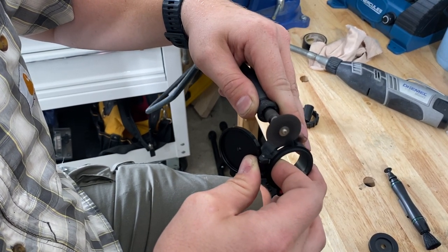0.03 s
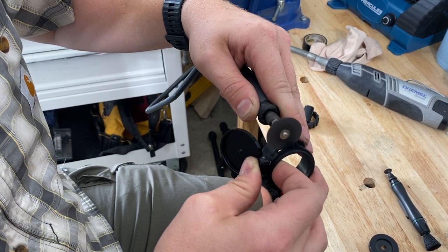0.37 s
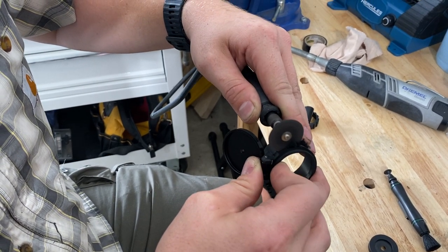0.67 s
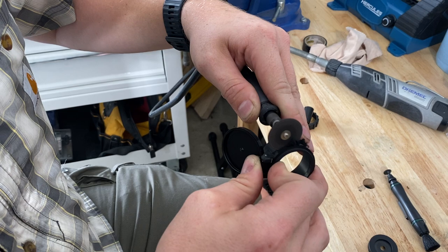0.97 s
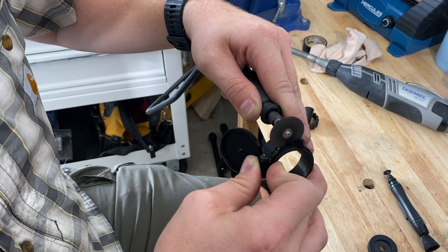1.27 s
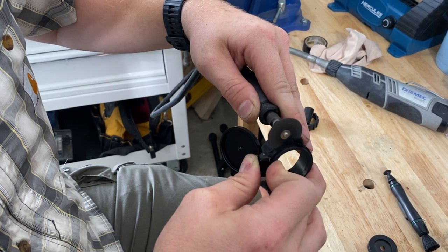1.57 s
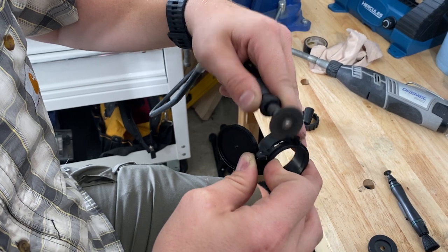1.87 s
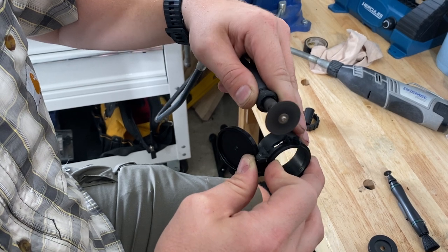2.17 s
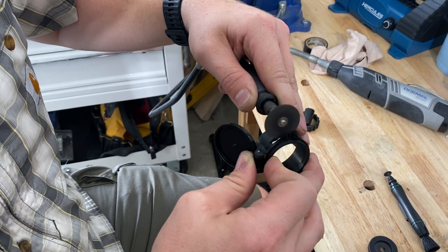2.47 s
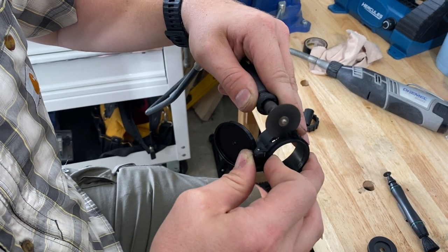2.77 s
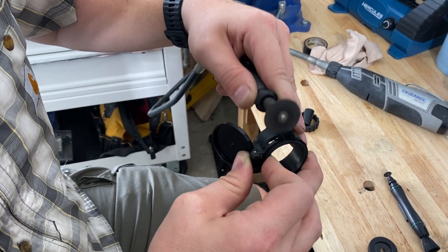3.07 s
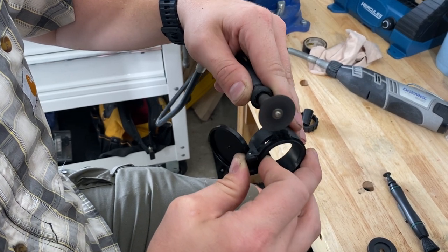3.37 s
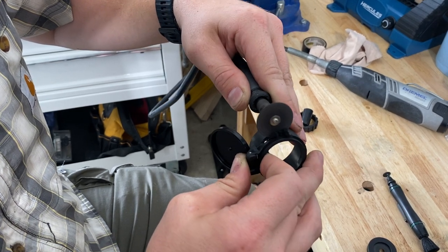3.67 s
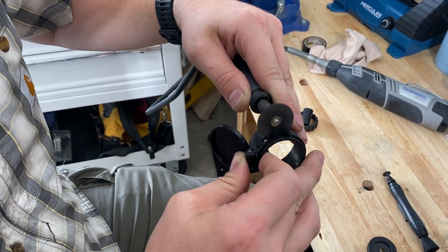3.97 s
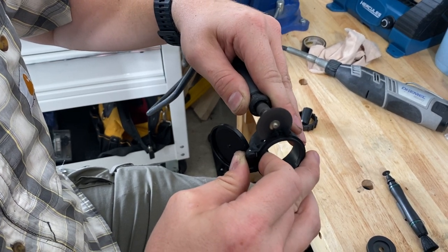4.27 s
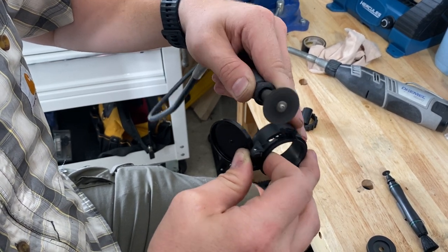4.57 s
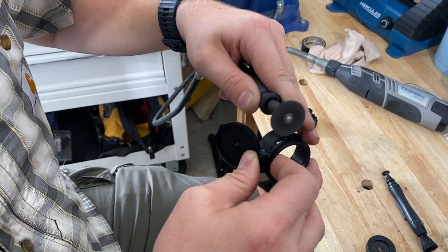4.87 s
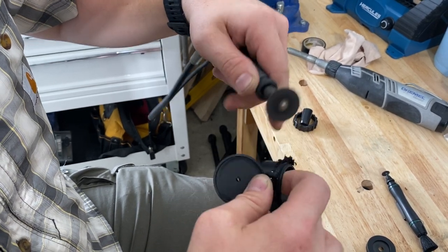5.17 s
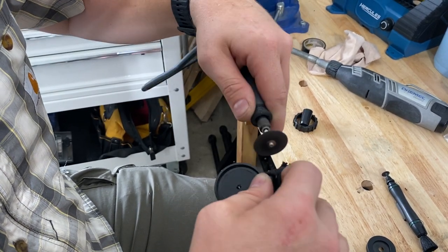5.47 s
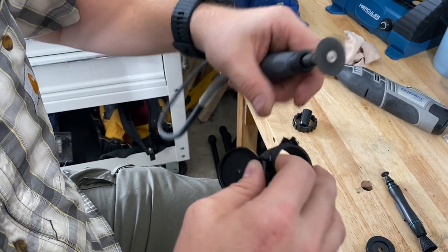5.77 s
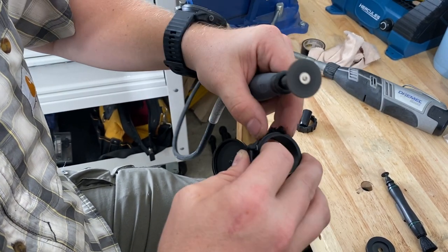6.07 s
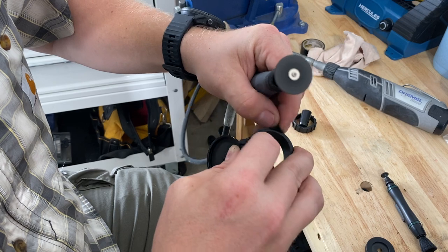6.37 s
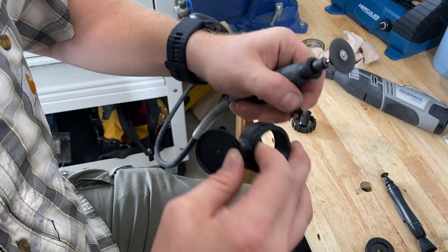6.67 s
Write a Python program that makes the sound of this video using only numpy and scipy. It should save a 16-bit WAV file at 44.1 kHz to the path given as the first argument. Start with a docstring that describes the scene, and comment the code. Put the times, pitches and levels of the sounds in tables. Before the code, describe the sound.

A handheld rotary tool is already cutting hollow plastic at the start, close to the microphone, with a chattering, gritty rasp and a high squeal over the motor's laboured whine. At about 1.9 seconds the wheel lifts and the pitch climbs. A second, rougher cut runs from 2.3 to 3.1 seconds, dragging the pitch down before it recovers again. The third cut, from 3.7 to 4.5 seconds, slows the motor once more and squeals most sharply just after 4 seconds. The motor then speeds back up. From 5 seconds the tool runs free with a stronger, steady hum, its flexible shaft whirring and buzzing in its sleeve, with short rattles near 5.8 and 6.7 seconds. It is still running at the end, just before 7 seconds. The workshop sounds fairly dry, with a faint low rumble and electrical hum underneath.

```python
"""A workbench, a phone's microphone close to a flexible-shaft rotary tool on a hollow plastic part.
The first of three cuts is under way: the slightly crooked wheel strikes the plastic once a turn and
grinds through it. Each cut drags the speed down, and the motor recovers whenever the wheel lifts.
At 5 s the tool is lifted away: the bent shaft whips, then runs free, humming and buzzing in its sleeve.
Low room rumble and mains hum lie under it all."""
import sys
import numpy as np
from scipy import signal
from scipy.fft import rfft, irfft
from scipy.io import wavfile
from scipy.ndimage import uniform_filter1d, map_coordinates

SR = 44100
rng = np.random.default_rng(int(sys.argv[2]) if len(sys.argv) > 2 else 0)


def persist_wave(psi):
    """Save psi, clipped to +-1, as 16-bit WAV."""
    counts = np.round(np.clip(psi, -1, 1) * 32767).astype(np.int16)
    wavfile.write(sys.argv[1], SR, np.atleast_2d(counts).T)


N = 301644
TIME = np.arange(N) / SR
FREQS = np.fft.rfftfreq(N, 1 / SR) + 1e-3
IDLE_HZ, LIFT_S = 268.9, 4.99  # unloaded shaft speed; when the tool is lifted away
BITE_S, LET_GO_S = .03, .033  # the wheel takes hold and lets go

# wheel in the plastic from touch to lift, one table a cut: time_s, wall_db, grip_db, grit_db
CUTS = [
    [(0, -35, -40, -36), (.56, -31, -33.5, -37), (.69, -22.5, -26.5, -31.5), (.855, -26, -21.5, -23.5),
     (.89, -34, -39, -32), (.98, -33, -30.5, -28.5), (1.0, -25, -36, -29.5), (1.07, -26, -26, -31.5),
     (1.27, -26, -24.5, -30), (1.42, -26, -27.5, -36), (1.585, -33.5, -28, -30), (1.615, -24.5, -41, -30),
     (1.68, -27.5, -31, -33.5), (1.9, -30.5, -36, -33.5)],
    [(2.307, -42, -44, -38), (2.58, -32, -39.5, -28.5), (2.88, -35.5, -34.5, -33), (2.96, -31, -39, -32),
     (3.09, -31.5, -33.5, -32.5)],
    [(3.655, -22, -41, -40), (3.75, -22.5, -39.5, -33.5), (3.84, -20.5, -32.5, -33),
     (4.0, -26.5, -25.5, -25.5), (4.14, -25, -22, -26.5), (4.28, -29, -27, -32.5),
     (4.44, -30, -29.5, -31.5), (4.51, -29, -37.5, -34)],
]
# how much the wheel skids: time_s, skid (0 an even whine, 1 a rough rasp)
SKID = [(0, .25), (.55, .2), (.66, .15), (.86, .25), (.9, .9), (1.08, .7), (1.2, .08), (1.55, .06),
        (1.62, .7), (1.68, .12), (1.91, .25), (2.3, .8), (2.7, .9), (2.86, .7), (2.96, .15), (3.1, .25),
        (3.65, .5), (3.88, .7), (3.98, .45), (4.1, .05), (4.45, .08), (4.52, .6)]
# slow drifts in the level of the running tool: time_s, hum_db, motor_db
LEVEL_DRIFT = [(0, -1, -1), (1.1, -5, 1.5), (1.8, -7.5, -1.5), (2.35, -2, 0.5), (3.2, -1.5, -0.5),
               (3.85, 0.5, 2.5), (4.55, -6, -4.5), (4.9, -8, -2.5), (5.15, -4, 4), (6.84, -1, 4)]


def cutting(turns, hz):
    """The wheel chatters and scrapes on the plastic, which rings and squeals while the abrasive hisses."""
    wall_db, grip_db, grit_db = curves(np.vstack(CUTS))
    # the later cuts begin with a touch that throws off a burst of grit
    grit_db += 12 * sum(np.exp(-abs(TIME - cut[0][0]) / .031) for cut in CUTS[1:])
    # a weak grip scrapes loosely, a strong one chatters regularly
    loose = 1 / (1.5 + np.exp((grip_db + 36.5) / 2.8))
    skid = curves(SKID)[0]
    slipping = loose * (.15 + .75 * skid)
    # a loose bite lets the wheel swing on its shaft; a skid makes every turn land early or late
    swing = twist(turns)
    turns = turns + .05 * (hz / IDLE_HZ) ** 3 * (.1 + 1.5 * loose) * swing + .0055 * skid * walk(110)
    strike = knocks(turns, jitter_s=4e-6, scatter_db=1)
    # a lighter second touch drifts round the wheel, so the overtones swell and shift
    graze = knocks(turns + .42 + .005 * walk(9), jitter_s=1e-5, scatter_db=1.5)
    chatter = np.sqrt(1 - slipping) * unit(strike + .55 * graze)
    scrape = np.sqrt(slipping) * rub(turns, depth_db=4.5, grain_db=2)
    force = chatter + scrape + .35 * tread(turns, depth_db=3)
    travel = bending(delay_s=.004)
    ringing = wall(force, travel, turns, hz, loose, wall_db)
    ringing += body(force, travel, loose, skid) * undb((wall_db + grip_db) / 2)
    ringing += rim(force, travel, turns, hz, loose, skid) * undb(grip_db)
    # only a firm bite gives the squeal overtones; they replace part of the hiss
    firm = .65 * (1 - loose) ** 4
    overtones = np.sqrt(firm) * shriek(turns, hz, loose)
    abrasive = unit(chatter + .9 * tread(turns, depth_db=5)) * np.sqrt(1 - slipping)
    hiss = grinding(abrasive, travel, turns, loose, skid, firm, swing)
    pressure = undb(walk(20))  # the hand trembles
    return contact() * pressure * (ringing + (overtones + hiss) * undb(grit_db) + whine(turns, hz, loose))


def wall(force, travel, turns, hz, loose, wall_db):
    """The part's wall rings with the strikes; pressed hard but loosely, it sings at its sharpest mode."""
    # the wall's broad modes and its singing one: pitch_hz, width_hz, level_db
    broad_modes = [(2950, 600, -3.5), (3220, 610, 3), (3320, 420, -5), (4250, 940, -7.5)]
    singing_mode = [(3100, 150, 0)]
    note = steady(colour(force, resonances(singing_mode) * travel))
    struck = steady(colour(force, resonances(broad_modes) * travel))
    rubbed = squeal(turns - .55, 3200, hz, .4 * loose, sharpness=3.2)
    ring = steady(.8 * (1 - loose) * rubbed + struck)
    singing = np.clip(1.1 * loose * (wall_db + 32) / 12, 0, .55)  # sets in above -32 dB
    return steady(np.sqrt(1 - singing) * ring + np.sqrt(singing) * note) * undb(wall_db)


def body(force, travel, loose, skid):
    """The rest of the hollow part rings along, louder and less evenly under a loose bite."""
    # modes of the part: pitch_hz, width_hz, level_db
    modes = [(1410, 1040, -25), (1860, 270, 1), (2490, 165, 9.5), (3770, 200, -3), (7280, 920, 0.5)]
    level_db = -7 + loose * (3.5 + 3 * skid + 3 * walk(20))
    return steady(colour(force, resonances(modes) * travel)) * undb(level_db)


def rim(force, travel, turns, hz, loose, skid):
    """The rim squeals under a firm grip and rings at its own modes under a loose or skidding one."""
    # modes of the rim: pitch_hz, width_hz, level_db
    modes = [(4870, 580, 2), (5470, 810, 5), (7660, 590, -11)]
    ring_share = .05 + .7 * loose + .25 * skid
    ring = steady(colour(force, resonances(modes) * travel))
    sing = squeal(turns - .22, slip_pitch(hz), hz, loose, sharpness=1.9)
    return ring * np.sqrt(ring_share) + sing * np.sqrt(1 - ring_share)


def shriek(turns, hz, loose):
    """Two overtones of the rim's squeal, in shorter bursts."""
    octave = squeal(turns - .18, 2 * slip_pitch(hz), hz, loose, sharpness=3.5)
    top = squeal(turns - .1, 2.84 * slip_pitch(hz), hz, loose, sharpness=7)
    return (octave + .42 * top) * undb(-8.5)


def grinding(abrasive, travel, turns, loose, skid, firm, swing):
    """The grit hisses through the plastic, and a firm bite also tears off chips in a broad sizzle."""
    # the gritty hiss as the phone picks it up, with a notch near 8.3 kHz: frequency_hz, level_db
    hiss_spectrum = [(3000, -11), (5600, -3.5), (6500, -7.5), (7400, 5.5), (8300, -9), (9300, 6),
                     (10500, 9.5), (11700, 5), (13200, -4), (15500, -8)]
    # sizzle of the chips: frequency_hz, level_db
    chip_spectrum = [(9000, -55), (12000, -17), (13000, 2), (14300, 3), (15500, 2)]
    grains = (.2 + 1.1 * loose + .5 * skid) * rub(turns, depth_db=4.5, grain_db=2.2) + abrasive
    grit = steady(colour(grains, undb(across(hiss_spectrum)) * travel))
    # a loose wheel scratches unevenly and bounces in and out of the cut as the shaft twists
    scratch = undb(2 * loose * (walk(32) + swing))
    chips = .3 * rub(turns, depth_db=7, grain_db=2) + abrasive
    sizzle = steady(colour(chips, undb(across(chip_spectrum)) * travel)) * undb(-1)
    return scratch * (grit * np.sqrt(1 - firm) + sizzle * np.sqrt(firm))


def whine(turns, hz, loose):
    """Deep in the plastic the wheel's edge sings two high, gliding tones."""
    # the deepest bites, one table each: time_s, lower_hz, upper_hz, level_db
    bites = [
        [(1.04, 10300, 14500, -46), (1.15, 10100, 14300, -41.5), (1.32, 9600, 13600, -40),
         (1.52, 9800, 13800, -45.5), (1.85, 9900, 14100, -49)],
        [(3.88, 10500, 14700, -45), (3.94, 9900, 14400, -34), (4.0, 10000, 14000, -31.5),
         (4.07, 10150, 13650, -34), (4.11, 9900, 13300, -31), (4.16, 9300, 13300, -28),
         (4.22, 9700, 13200, -28), (4.27, 9950, 13100, -32), (4.36, 9700, 13000, -31), (4.48, 9900, 13100, -36)],
    ]
    lower_hz, upper_hz, db = curves(np.vstack(bites))
    waver = .15 + .5 * loose
    lower = squeal(turns - .18, lower_hz, hz, waver, sharpness=4)
    upper = squeal(turns - .1, upper_hz, hz, waver, sharpness=2.8)
    biting = sum(gate(bite[0][0], bite[-1][0], BITE_S, LET_GO_S) for bite in bites)
    return (lower + upper * undb(-7.5)) * undb(db) * biting


def spurts():
    """Short sprays of plastic dust off the wheel."""
    # dust and flung chips: peak_s, half_length_s, level_db
    sprays = [(.11, 0.025, -31), (0.285, 0.075, -31.5), (4.92, 0.011, -42)]
    level = sum(np.exp(-abs(TIME - s) / length) * undb(db) for s, length, db in sprays)
    return colour(noise(), resonances([(10500, 2000, 3), (14000, 2200, -8)])) * level


def shaft_hum(turns, hz):
    """Unbalance hums at the first two orders: the first grows with speed, both as the shaft bends."""
    # the first order drops out briefly: centre_s, half_width_s
    dropouts = [(.88, 0.058), (2.28, 0.033), (3.49, 0.049), (4.929, 0.018), (5.702, 0.093)]
    angle = 2 * np.pi * turns
    bent, whip = lift()
    dips = np.prod([1 - .99 * np.exp(-((TIME - s) / width) ** 2) for s, width in dropouts], axis=0)
    first_db = -25 + 31 * np.log2(hz / IDLE_HZ) + 4.5 * bent + 5.5 * whip
    first = np.sin(angle) * dips * undb(first_db + 1.2 * (1 - bent) * walk(9))
    waver = 1 + (.6 - .4 * bent) * walk(14)
    second_db = -45 + 5.5 * contact() * (.5 + curves(SKID)[0]) + 3.9 * bent
    return first + np.sin(2 * angle + .5 * walk(35)) * waver * undb(second_db)


def sleeve_buzz(turns, whip):
    """The bent shaft slaps its sleeve once a turn: a buzz, two ringing modes and a low drone."""
    # the shaft in its sleeve: time_s, buzz_db, lower_mode_db, upper_mode_db, drone_db
    levels = [(5.08, -34, -50, -55, -46), (5.5, -32.5, -40.5, -73, -46.5), (5.9, -29, -38, -44, -46),
              (5.99, -35, -27, -47, -47), (6.13, -32.5, -25.5, -33.5, -40.5),
              (6.52, -31.5, -38.5, -34.5, -45), (6.7, -31, -28, -39, -58), (6.84, -32.5, -36, -43, -69)]
    # modes of the sleeve: pitch_hz, width_hz
    modes = [(1900, 36), (2180, 54)]
    # spectra of the buzz and of the drone: frequency_hz, level_db
    buzz_spectrum = [(20, -80), (900, -22), (1380, 0), (1650, 3), (2200, -43), (2720, 7.5), (3000, 9.5),
                     (3260, 11), (3540, 4), (3810, 6), (4080, 0), (4350, 5), (4620, 5), (4900, 7.5),
                     (5400, 0.5), (5900, -7.5), (8000, 0), (15000, -22)]
    drone_spectrum = [(20, -80), (550, -25), (820, 5), (1090, 2.5), (1370, -3), (1650, -8), (2200, -41),
                      (4000, -45)]
    buzz_db, lower_db, upper_db, drone_db = curves(levels)
    slaps = knocks(turns + .006 * whip * walk(45), jitter_s=8e-6, scatter_db=.6)
    sliding = (.06 + .9 * whip ** 2) * rub(turns, depth_db=4, grain_db=2)
    travel = bending(delay_s=.022)
    buzz = steady(colour(slaps + sliding, undb(across(buzz_spectrum)) * travel))
    buzz *= undb(buzz_db - whip + 2 * twist(turns))
    # the lower mode rings steadily, the upper one throbs as the shaft twists
    lower, upper = (steady(colour(slaps, resonances([(f, width, 0)]) * travel)) for f, width in modes)
    ring = lower * undb(lower_db) + upper * undb(upper_db + 3.9 * twist(turns))
    drone = colour(slaps, undb(across(drone_spectrum)) * travel) * undb(drone_db)
    return buzz + ring + drone


def shaft_whirr(turns, whip, whip_hz=16, flare_s=5.3):
    """The whipping shaft flails in a throbbing whirr; just after the lift it also rings higher."""
    swing = .084 * (whip + .03) * np.sin(2 * np.pi * whip_hz * TIME + 1.2 * walk(7))
    flails = knocks(turns + swing, jitter_s=1e-5, scatter_db=.8)
    travel = bending(delay_s=.022)
    flare_db = 7 * np.exp(-((TIME - flare_s) / .058) ** 2)  # the hand turns
    throb_db = 4 * (.3 + .5 * whip) * twist(turns)
    whirr_db = -39 + 3.4 * whip + throb_db + flare_db
    whirr = colour(flails, resonances([(2410, 210, 0)]) * travel) * undb(whirr_db)
    high_ring = colour(flails, resonances([(2790, 200, 0)]) * travel) * undb(-35 + 4 * twist(turns))
    return whirr + high_ring * whip ** 8


def shaft_rattle(turns):
    """The free shaft is flexed twice and rattles each time."""
    # flexes of the shaft: start_s, end_s, level_db
    flexes = [(5.747, 5.812, -27.5), (6.606, 6.804, -34.5)]
    # modes of the rattling shaft: pitch_hz, width_hz, level_db
    modes = [(3350, 510, -1), (4630, 440, 5.5), (5440, 860, -5)]
    level = sum(gate(start, end, rise_s=.026, fall_s=.053) * undb(db) for start, end, db in flexes)
    return colour(knocks(turns, jitter_s=3e-5, scatter_db=2), resonances(modes)) * level


def motor(turns, hz, critical_hz=244.6):
    """Cooling air rushes, the brushes ring the housing, and the armature growls harder under load."""
    # spectra of the cooling air and of the armature: frequency_hz, level_db
    air_spectrum = [(100.0, -15.5), (330.0, -3), (680.0, -12), (1000.0, 1), (1350, 7), (2000.0, 2),
                    (3100.0, 3), (4900.0, 4), (6600.0, -5), (8800.0, 4), (10500.0, -5.5), (13000.0, -6.5),
                    (15500.0, -15)]
    growl_spectrum = [(20, -48), (400, -2), (580, 2.5), (780, 0), (1000, 2.5), (1500, 6), (2000, 3.5),
                      (3000, 8.5), (5000, -27), (9000, -12.5)]
    # modes of the housing: pitch_hz, width_hz, level_db
    modes = [(1485, 73, -3.5), (2550, 120, 2), (2540, 300, -6)]
    bent, whip = lift()
    rush = rub(turns, depth_db=2.5, grain_db=1.5)
    air_db = -35 + 8.5 * np.log2(hz / IDLE_HZ) - 1.8 * bent + .5 * walk(8.6)
    air = colour(rush, undb(across(air_spectrum))) * undb(air_db)
    # the housing rings most near one speed and in a skid; it dies away as the free shaft settles
    critical = np.exp(-((hz - critical_hz) / 3.2) ** 2)
    shaken = contact() * curves(SKID)[0]
    housing_db = -41 + 3.5 * critical + 2.5 * shaken + 2 * whip - 43 * (bent - whip)
    housing = steady(colour(noise(), resonances(modes)))
    housing *= undb(housing_db + 3.3 * twist(turns) + 1.5 * walk(8.2))
    load = 1 - hz / IDLE_HZ  # the slower it turns, the more current it draws
    tugs = knocks(turns + .011 * walk(25), jitter_s=3.5e-5, scatter_db=1.3)
    growl = colour(tugs, undb(across(growl_spectrum)) * bending(delay_s=.007))
    return air + housing + growl * undb(-43 + 23.5 * load + 3 * walk(34))


def workshop():
    """Room tone behind the bench: low rumble and mains hum."""
    # mains hum: pitch_hz, level_db
    mains = [(60, -65.5), (120, -57.5)]
    # room rumble: frequency_hz, level_db
    rumble = [(20, -32), (35, -18), (55, -16), (90, -13.5), (125, -8), (170, -14), (300, -17), (600, -23)]
    hum = sum(unit(np.sin(2 * np.pi * hz * TIME)) * undb(db + 2 * walk(23)) for hz, db in mains)
    return hum + colour(noise(), undb(across(rumble))) * undb(-43.5)


def reflections(x, t60_s):
    """Bench and walls scatter the sound into a short diffuse tail."""
    tail = noise() * undb(-60 * TIME / t60_s) * (TIME > .002)
    return irfft(rfft(x, 2 * N) * rfft(tail / np.sqrt(np.sum(tail ** 2)), 2 * N))[:N]


def stereo_spread(direct):
    """Left and right differ in phase and level by frequency, spreading the sound; each adds room tail."""
    # phase between left and right: frequency_hz, left_lead_rad
    phase = [(60, 0.48), (270, 0.32), (1000, 0.9), (2070, 0.57), (3010, 1.84), (3880, 0.8), (5860, 1.56),
             (6980, -1.5), (8790, -3), (9730, -8), (10300, -5), (11800, -10), (12300, -8), (13600, -12),
             (14400, -12), (15600, -16)]
    # stereo balance: frequency_hz, left_minus_right_db
    balance = [(60, -2), (270, -1.3), (400, .5), (850, -2), (1350, -3.3), (2100, 1), (2500, 0), (3050, 6),
               (4100, 4), (5100, 6.5), (6500, 3), (8500, 0), (15000, 0)]
    # reflected against direct sound: frequency_hz, level_db
    room_share = [(100, -14), (280, -21), (500, -5), (1400, -6), (2000, -11), (5000, -9.5), (6500, -7),
                  (10000, -10), (15000, -7)]
    diffuse = undb(across(room_share))
    channels = []
    for side in (1, -1):
        near = rfft(direct) * np.exp(.5j * side * across(phase))
        far = rfft(reflections(direct, t60_s=.16)) * diffuse
        side_gain = undb(side * across(balance) / 2)
        channels.append(irfft((near + far) / np.sqrt(1 + diffuse ** 2) * side_gain, N))
    return np.array(channels)


def speed(recover_s=.265, creep_hz_per_s=2.45):
    """Each cut drags the shaft down, then it closes in on idle; running free, it creeps faster."""
    # shaft speed while the wheel drags, one table a cut: time_s, speed_hz
    drags = [
        [(0, 187), (.2, 186.7), (.33, 184.8), (.4, 186.2), (.57, 200.6), (.65, 205.3), (.71, 205.4),
         (.755, 209), (.83, 204.7), (.92, 205), (1.06, 213.2), (1.14, 209.2), (1.28, 198.1), (1.34, 194.9),
         (1.42, 195.2), (1.52, 198.6), (1.7, 201.1), (1.86, 206), (1.92, 210)],
        [(2.3, 255.8), (2.38, 256.5), (2.5, 241), (2.64, 208), (2.73, 187.5), (2.86, 185.1), (2.92, 180.2),
         (3.0, 179.6), (3.06, 182.7), (3.1, 188)],
        [(3.65, 258), (3.83, 238), (3.91, 220), (3.97, 209.3), (4.06, 198.9), (4.12, 192.5), (4.24, 191.3),
         (4.36, 189.6), (4.47, 190.5), (4.51, 192)],
    ]
    hz = np.zeros(N)
    for cut in drags:
        recovery = np.exp(-np.maximum(TIME - cut[-1][0], 0) / recover_s)
        this_cut = IDLE_HZ + (curves(cut)[0] - IDLE_HZ) * recovery
        hz = np.where((TIME >= cut[0][0]) | (hz == 0), this_cut, hz)
    return hz + creep_hz_per_s * np.maximum(TIME - LIFT_S, 0)


def contact():
    """1 while the wheel is in the plastic."""
    return sum(gate(cut[0][0], cut[-1][0], BITE_S, LET_GO_S) for cut in CUTS)


def lift(rise_s=.13, settle_s=.62):
    """How far lifting the tool away bends the shaft, and how hard it still whips; both 0-1."""
    bent = np.clip((TIME - LIFT_S) / rise_s, 0, 1)
    return bent, bent * np.exp(-((TIME - LIFT_S - rise_s) / settle_s) ** 2)


def twist(turns):
    """The flexible shaft twists to and fro about every tenth turn; -1 to 1."""
    return np.sin(2 * np.pi * .095 * turns + .6 * walk(5))


def slip_pitch(hz):
    """Pitch of the rim's squeal in Hz: a faster wheel squeals higher."""
    return 4870 * (hz / 191) ** .8


def squeal(turns, slip_hz, hz, loose, sharpness):
    """Once a turn the wheel sticks and slips in a short swelling burst; a loose bite makes it waver."""
    place = (turns + .2) % 1 - .5
    burst = np.cos(np.pi * place) ** (2 * sharpness)
    angle = 2 * np.pi * slip_hz * place / hz + (.15 + 2.2 * loose) * walk(70)
    return unit(np.sin(angle) * burst * undb(.5 * walk(80)))


def knocks(turns, jitter_s, scatter_db):
    """One sharp pulse a turn, each a little early or late, weak or strong."""
    count = np.arange(1, int(turns[-1]))
    chance = rng.standard_normal((len(count), 2))
    at = (np.interp(count, turns, TIME) + jitter_s * chance[:, 0]) * SR
    # a windowed sinc places each pulse between samples
    taps = np.floor(at)[:, None] + np.arange(-5, 7)
    offset = taps - at[:, None]
    pulses = np.sinc(offset) * np.sinc(offset / 6) * undb(scatter_db * chance[:, 1:])
    return unit(np.bincount(np.clip(taps, 0, N - 1).astype(int).ravel(), pulses.ravel(), N))


def rub(turns, depth_db, grain_db):
    """Grainy friction noise that swells once a turn."""
    return unit(noise() * undb(depth_db * np.cos(2 * np.pi * turns) + grain_db * walk(2100)))


def tread(turns, depth_db, count=170):
    """The wheel's own pattern of abrasive grains passes once a turn, pressed hardest on the high side."""
    grains = map_coordinates(rng.standard_normal(count), [turns % 1 * count], mode="grid-wrap")
    return unit(grains * undb(depth_db * np.cos(2 * np.pi * turns)))


def bending(delay_s):
    """Bending waves are dispersive: lows arrive later; delay_s is the travel time at 3 kHz."""
    return np.exp(-4j * np.pi * delay_s * np.sqrt(3000 * FREQS))


def resonances(modes):
    """Gain of a set of steep-sided resonances."""
    gains = (undb(db) / (1 + ((FREQS ** 2 - f ** 2) / (FREQS * width)) ** 2) for f, width, db in modes)
    return np.sqrt(sum(gain ** 2 for gain in gains))


def gate(start_s, end_s, rise_s, fall_s):
    """Rise until the start, hold, and fall after the end; 0-1."""
    return np.clip(1 + np.minimum((TIME - start_s) / rise_s, (end_s - TIME) / fall_s), 0, 1)


def curves(rows):
    """Each column of a timed table at every sample."""
    s, *columns = np.transpose(rows)
    return [np.interp(TIME, s, c) for c in columns]


def across(points, hz=FREQS):
    """Read (Hz, value) points on a log-frequency axis."""
    f, value = np.transpose(points)
    return np.interp(np.log(hz), np.log(f), value)


def colour(x, response):
    """Filter by a frequency response; rms 1."""
    return unit(irfft(rfft(x) * response, N))


def steady(x, size=1800):
    """Hold the short-term rms at 1, so that a level curve alone sets the loudness."""
    return x / np.sqrt(uniform_filter1d(x ** 2, size) + 1e-9)


def walk(rate_hz):
    """Smooth random wander with spread 1."""
    return colour(noise(), np.exp(-np.minimum(FREQS / rate_hz, 20) ** 2))


def noise():
    """White noise."""
    return rng.standard_normal(N)


def unit(x):
    """Scale to rms 1."""
    return x / np.sqrt(np.mean(x ** 2))


def undb(db):
    """Decibels to gain."""
    return 10 ** (np.asarray(db) / 20)


def scene():
    """All parts of the tool turn with one shaft, close to the microphone, with the workshop behind."""
    hz = speed() * (1 + .0008 * walk(14))
    turns = np.cumsum(hz) / SR
    hum_db, motor_db = curves(LEVEL_DRIFT)
    bent, whip = lift()
    tool = cutting(turns, hz) + shaft_hum(turns, hz) * undb(hum_db)
    tool += bent * (sleeve_buzz(turns, whip) + shaft_whirr(turns, whip) + shaft_rattle(turns))
    tool += motor(turns, hz) * undb(motor_db)
    return stereo_spread(tool + spurts() + workshop())


def record(dry, top_hz=15750):
    """The phone cuts the top treble steeply."""
    return signal.sosfilt(signal.ellip(12, .2, 80, top_hz, fs=SR, output="sos"), dry)


dry = scene()
out = record(dry)
persist_wave(out)
```